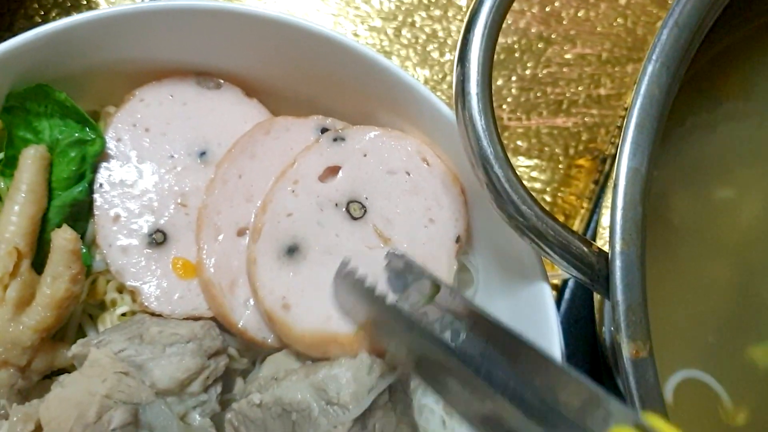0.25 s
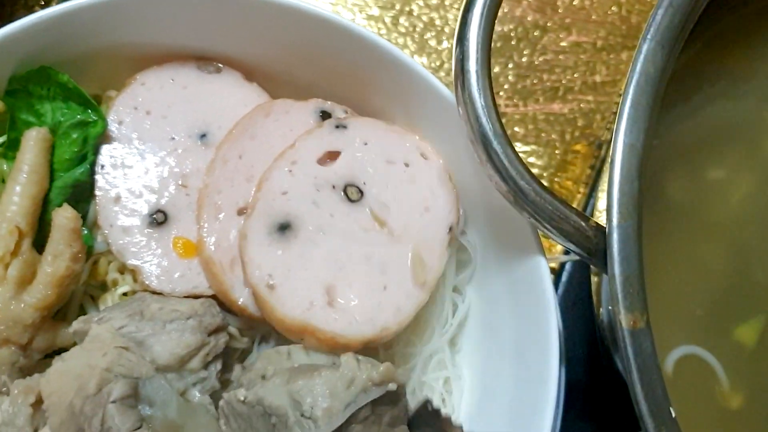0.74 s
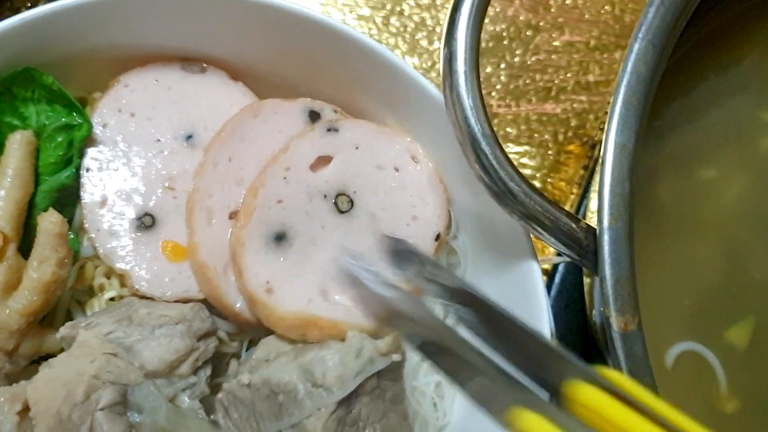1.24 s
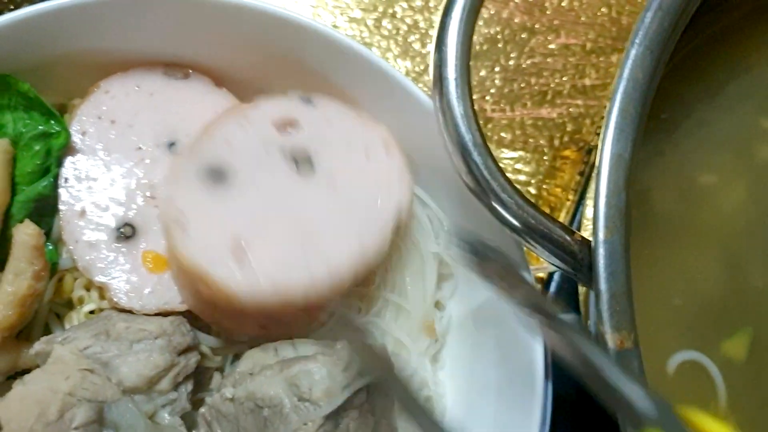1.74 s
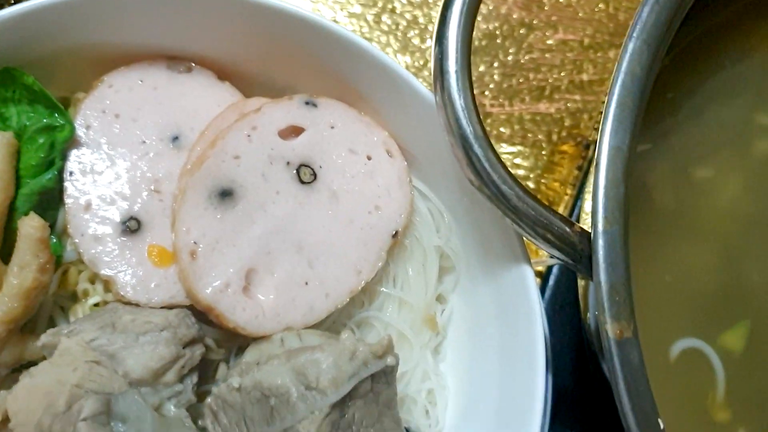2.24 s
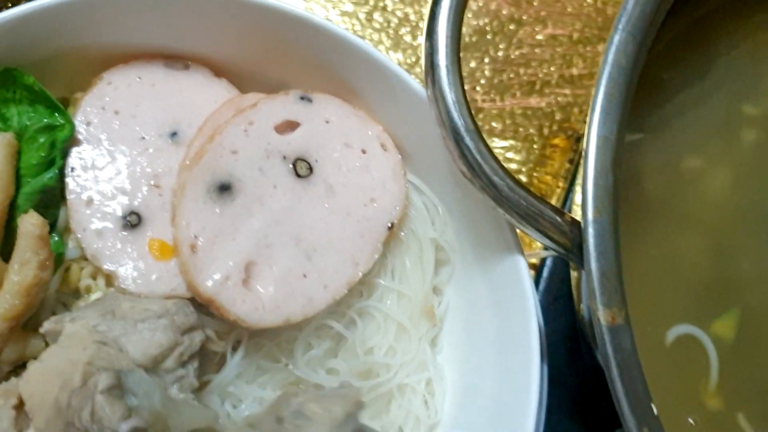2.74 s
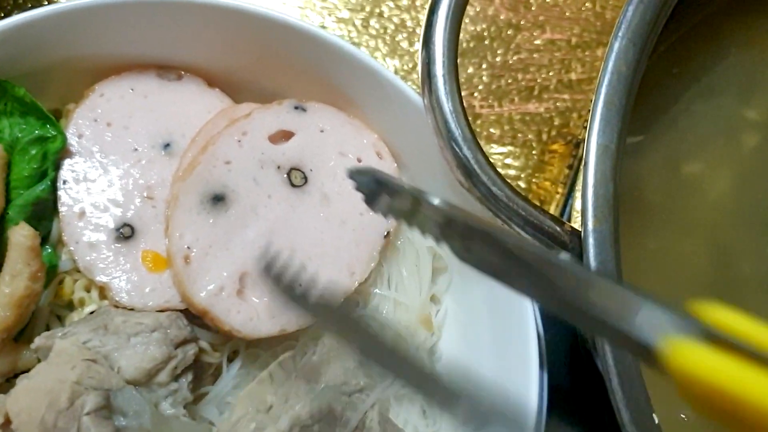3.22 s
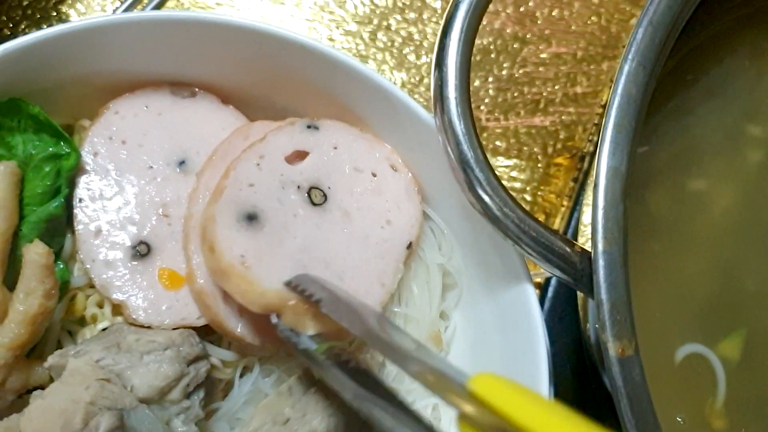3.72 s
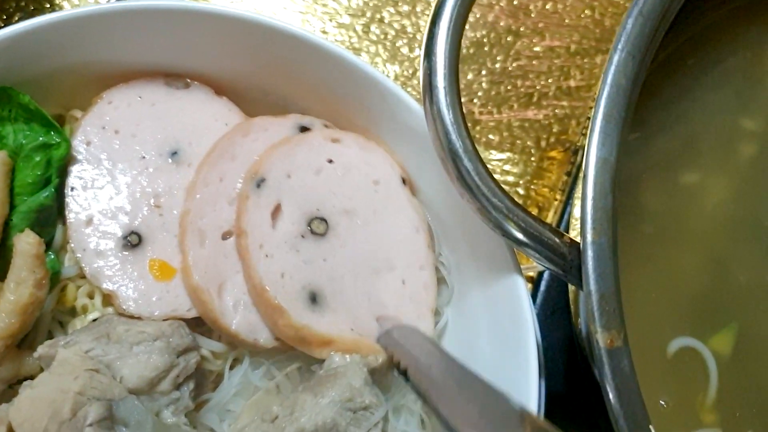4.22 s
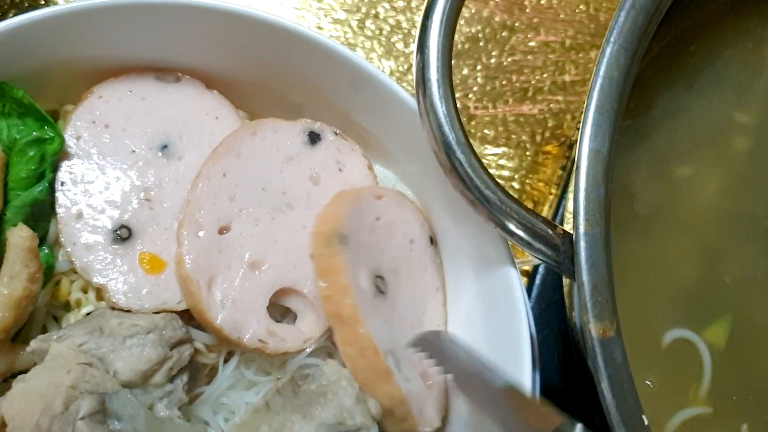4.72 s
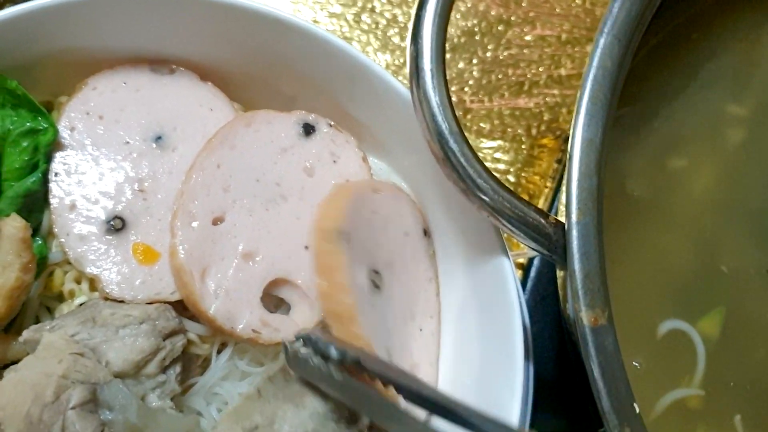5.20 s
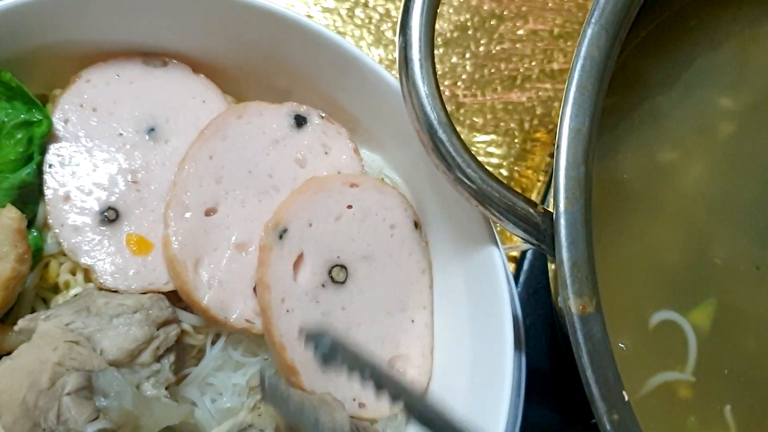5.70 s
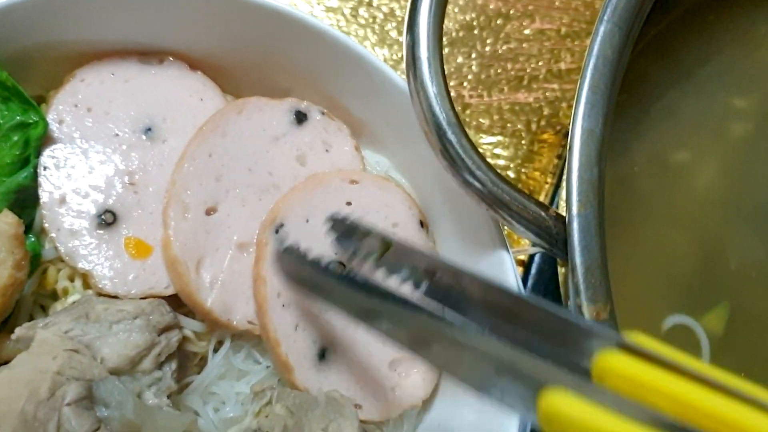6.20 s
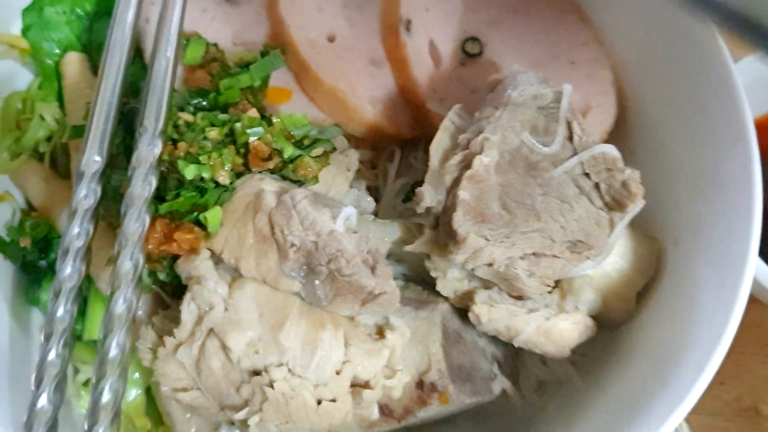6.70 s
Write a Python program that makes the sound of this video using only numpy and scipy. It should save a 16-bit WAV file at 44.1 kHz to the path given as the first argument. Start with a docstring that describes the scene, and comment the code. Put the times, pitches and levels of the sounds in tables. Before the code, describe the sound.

In a small kitchen with a low wavering motor hum, steel tongs work at a food-filled china bowl close to the microphone. Bright, short clinks come in the first two seconds, then mostly dull knocks and tiny scrapes, a last cluster of clinks before five seconds, and finally only hum, dropping suddenly to quieter room tone.

```python
"""A small kitchen with a low hum, where steel tongs arrange slices of sausage in a full china bowl.
They clink on the bowl and touch a steel pot: decaying modes behind a burst of noise, plus clear rim tones.
They knock dully through the food (low modes, softened), scrape with toothed tips (dense random slips
through the ringing arms) and shift the food wetly (swells of noise).
Shaped noise makes hum, rumble and hiss; near the end they drop abruptly to a quieter room tone."""
import sys
import numpy as np
from scipy import signal
from scipy.fft import rfft, irfft, next_fast_len
from scipy.io import wavfile

SR = 44100
rng = np.random.default_rng(int(sys.argv[2]) if len(sys.argv) > 2 else 0)


def bounce(signal):
    """Save signal as a 16-bit WAV file at the path given by the first command-line argument."""
    frames = np.transpose(np.atleast_2d(signal))
    limited = np.clip(frames, -1, 1)
    pcm = np.round(limited * 32767).astype(np.int16)
    wavfile.write(sys.argv[1], SR, pcm)


N = 306495  # samples

# tongs on the bowl: [t/s, attack level/dB, factor on the mode t60s, f/Hz favoured by the contact spot]
BOWL_CLINKS = [(.5012, -9.5, 0.37, 5070), (.582, -23, 0.33, 5730), (.767, -15, 0.34, 3140),
               (1.297, -6.5, 0.61, 8300), (2.1595, -8, 0.43, 12700), (2.578, -31.5, 0.26, 5240),
               (4.4545, -17.5, 0.3, 5360), (4.633, -26, 0.64, 2010), (4.708, -36.5, .7, 4350),
               (4.754, -39, .99, 4300)]
# modes of the bowl, damped by its filling: [f/Hz, relative level/dB, t60/s before the clink's factor]
BOWL_MODES = [(640, -17, .05), (900, -15, .05), (1590, -11, .075), (2120, -13, .06), (2835, 1, .11),
              (2980, -6, .06), (4340, 0, .08), (5350, -13, .05), (6145, -2.5, .08), (7250, -13, .04),
              (8165, -3, .07), (9460, -1.5, .055), (10370, 0, .06), (10850, -6, .05), (11635, 2, .055),
              (12880, 1, .06), (14480, -2, .055), (15550, 0, .06)]
# tongs on the pot: [t/s, attack level/dB, factor on the mode t60s, f/Hz favoured by the contact spot]
POT_TINKS = [(.0228, -24, 0.79, 4470), (1.783, -29.5, 0.73, 5700)]
# modes of the ringing steel: [f/Hz, relative level/dB, t60/s before the tink's factor]
STEEL_MODES = [(470, -17, .9), (1320, -7, .18), (2030, -14, .6), (2164, -14, .6), (2891, -10, .6),
               (3623, -2, .4), (4420, 2, .15), (4544, -12, .8), (4608, -11, .9), (4651, -11, .8),
               (5233, -4, .38), (5453, -13, .5), (5975, -7, .16), (6239, -14, .35), (6794, -9, .3),
               (7192, -11, .22), (7779, -9, .2), (10660, -13, .2), (12800, -9, .18), (15300, -9, .14)]
# noisy clash of the tongs: [f/Hz, relative level/dB per Hz]
CLASH_SPECTRUM = [(150, -20), (600, -2.5), (2000, -0.5), (4200, 4), (5200, 2), (7500, 3), (8900, 0.5),
                  (11000, 3.5), (16000, -2)]
# the rim sings on when the tongs spring clear: [t/s, level/dB of the main tone, f/Hz of the mode]
RIM_RINGS = [(0.504, -29, 4320), (.583, -27.5, 6145), (0.867, -36, 2826), (1.436, -32.5, 6120),
             (2.162, -23, 2826), (4.637, -30.5, 2840), (4.755, -31.5, 2826)]
# knocks through the food: [t/s, level/dB, hardness as the f/Hz above which the blow fades]
FOOD_KNOCKS = [(.025, -19.5, 280), (.776, -14, 1200), (1.305, -22, 600), (1.772, -27.5, 1830),
               (2.33, -25, 470), (2.578, -23.5, 650), (2.626, -24.5, 1250), (3.158, -24.5, 1200),
               (3.587, -20.5, 340), (3.808, -18, 200), (4.456, -22.5, 1020), (4.634, -29, 1300),
               (5.146, -34.5, 1400)]
# modes of the bowl rocking on the table: [f/Hz, relative level/dB, t60/s]
TABLE_MODES = [(180, -8, 0.13), (319.4, -4.5, 0.14), (353.2, -2, 0.2), (593, -4, 0.083), (822, -3.5, 0.097),
               (929.5, 5.5, 0.071), (1034, 3, 0.1), (1360, -3, 0.055)]
# toothed tips scraping: [t/s, rms level/dB of the steady stroke, length/s, L-R level/dB]
TIP_SCRAPES = [(.785, -21.5, 0.036, 2.5), (0.851, -38, 0.036, 4), (2.407, -34.5, 0.017, 3.5),
               (2.648, -27, 0.015, 2.5), (2.716, -47, 0.018, 8), (2.796, -45.5, .018, 6),
               (3.032, -38.5, 0.019, 1.5), (3.191, -31, 0.033, 2.5), (3.6, -46.5, 0.061, -15),
               (4.683, -39.5, 0.027, -1), (5.145, -47, 0.013, 10)]
# grit of the slipping teeth: [f/Hz, relative level/dB per Hz]
RASP_SPECTRUM = [(290, -42.5), (500, -6), (933, -4.5), (2040, -6.5), (2850, -1.5), (3650, -5.5), (4210, -9),
                 (6230, -8), (7000, -5), (9360, -13), (10400, -4.5), (13400, -15), (16000, -42)]
# modes of the tongs' arms, damped by the hand: [f/Hz, relative level/dB, t60/s before the scrape's factor]
ARM_MODES = [(2975, -7, 0.13), (4270, 5.5, 0.034), (5480, -1.5, .04), (6946, -2.5, 0.084), (7710, 1, 0.037),
             (10500, -24.5, 0.014), (13100, -1, 0.028), (13700, -29, 0.031), (14100, -3, 0.034)]
# food sliding wetly: [t/s of the middle, rms level/dB at the peak, half length/s]
FOOD_SLIDES = [(2.652, -44.5, 0.1), (3.628, -38, 0.061)]
# wet rustle of the food: [f/Hz, relative level/dB per Hz]
SQUISH_SPECTRUM = [(80, 8), (250, -1), (950, -1), (1600, -9), (6000, -14.5), (15000, -22)]
# motor drone: [centre f/Hz, half width f/Hz, rms level/dB before the stereo lean]
HUM_BANDS = [(68.3, 2.54, -41.5), (47.3, 4.5, -51), (99.6, 13.4, -48), (358.3, 22, -56.5)]
# rumble: [f/Hz, relative level/dB per Hz]
RUMBLE_SPECTRUM = [(12, -49), (20, -17.5), (48, -4.5), (60, 5), (76, 2.5), (97, -13.5), (189, -11),
                   (220, -16), (290, -50), (480, -120)]
# course of the rumble, of which only the swing about its mean is used: [t/s, level/dB]
RUMBLE_COURSE = [(0.0, -44.5), (0.42, -41), (3.04, -45), (5.0, -39), (5.73, -41), (6.17, -37), (6.35, -40)]
# hiss: [f/Hz, relative level/dB per Hz]
AIR_SPECTRUM = [(76, -32), (130, -4.5), (194, -3.5), (228, -10.5), (356, -7), (565, -15), (863, -11.5),
                (2050, -20), (2950, -20.5), (3460, -22), (5620, -22.5), (7300, -23.5), (8740, -32.5),
                (11600, -28.5), (16000, -37.5)]
# quieter room tone: [f/Hz, relative level/dB per Hz]
QUIET_SPECTRUM = [(15, -46), (25, -41.5), (59, 7), (161, -20), (256, -12.5), (293, -21.5), (734, -28.5),
                  (863, -25.5), (2000, -33), (2840, -29), (3520, -37.5), (6050, -31), (9320, -44),
                  (12500, -39), (16000, -52)]
# stereo lean of the background, leftward in the treble: [f/Hz, L-R level/dB]
BACKGROUND_LEAN = [(60, -1.0), (180, -0.5), (550, -0.5), (1650, 3), (4970, 2.5), (15000, 2)]
# left-right correlation of the noises, negative values counting as 0: [f/Hz, correlation]
STEREO_LIKENESS = [(60, 0.98), (150, 0.96), (380, 0.92), (950, 0.24), (2380, -1.76), (5980, -0.83),
                   (15000, 0.099)]
# reverberation of the kitchen: [f/Hz, t60/s]
KITCHEN_T60 = [(200, 0.45), (1000, 0.64), (3000, 0.48), (8000, 0.31), (15000, 0.31)]

CLASH_DB = -5  # noisy clash on the bowl, relative to its ring before spectral shaping
# firm blows are bright, light touches dull: tilts in dB per octave, and half width in dB of the turnover
FIRM_TILT_DB, LIGHT_TILT_DB, FIRM_RANGE_DB = -1.4, -6.5, 0.5
TONGS_PAN_DB = 1  # L-R
RIM_T60_CYCLES = 820  # so higher modes die sooner
RIM_TWIN_DB, RIM_TWIN_HZ = -8.5, 40  # a weaker twin this far below each mode makes it beat
SETTLE_S, SETTLE_DB, SETTLE_HZ = .019, 14, 60  # bowl drops back after a knock: delay, gain, hardness
# a scrape lands with a knock: dB for a 0 dB scrape, dB per dB of scrape, hardness
LANDING_DB, LANDING_GROWS, LANDING_HZ = -25, 0.21, 1400
BRUSH_SPAN_S = (1, 4.9)  # while the tongs pick at the slices, their tips brush the bowl by chance
BRUSH_DB, BRUSH_S, BRUSH_PAN_DB = -50.5, .007, 11  # rms, length, L-R
RUMBLE_TRIM_DB, RUMBLE_SWING = -40.5, 1.4  # level at the mean of the course, factor on its dB swing
AIR_DB, AIR_RISE_DB_PER_S = -44.5, 0.4122  # the hiss creeps up slowly
DROP_S = 6.44  # the quieter room tone sets in
TOP_HZ = 15900  # band limit


def amp(db):
    """Decibels to gain."""
    return 10 ** (np.asarray(db) / 20)


def unit(x):
    """Bring a sound to rms 1."""
    return x / np.sqrt(np.mean(x ** 2) + 1e-20)


def along(points, hz):
    """Read a (Hz, value) curve on a log frequency axis."""
    f, value = np.transpose(points)
    return np.interp(np.log(hz + 1), np.log(f + 1), value)


def filtered(x, response):
    """Shape a sound with a response given as a function of frequency."""
    n = x.shape[-1]
    padded = next_fast_len(n + 8192)
    hz = np.fft.rfftfreq(padded, 1 / SR)
    return irfft(rfft(x, padded) * response(hz), padded)[..., :n]


def coloured(x, spectrum):
    """Colour a sound with a spectrum, at rms 1."""
    return unit(filtered(x, lambda hz: amp(along(spectrum, hz))))


def add(track, s, sound, pan_db=0):
    """Mix a stereo sound into the track at s seconds."""
    part = track[:, round(s * SR):][:, :sound.shape[1]]
    panned = sound * amp([[pan_db / 2], [-pan_db / 2]])
    part += panned[:, :part.shape[1]]


def room_noise(gain):
    """Stereo noise at rms 1, near mono in the bass and diffuse in the treble."""
    def mid_side_gain(hz):
        turn = np.arccos(np.clip(along(STEREO_LIKENESS, hz), 0, 1)) / 2
        return gain(hz) * [np.cos(turn), np.sin(turn)]

    mid, side = filtered(rng.standard_normal((2, N)), mid_side_gain)
    return unit(np.array([mid + side, mid - side]))


def in_kitchen(sound, wet_db, build_s=0.0023, delay_s=.012):
    """Add the kitchen's diffuse tail: decaying noise, drawn afresh for every sound."""
    hz, t, z = signal.stft(rng.standard_normal((2, SR // 2)), SR, nperseg=256)
    decay = amp(-60 * t / along(KITCHEN_T60, hz)[:, None])
    build = 1 - np.exp(-t / build_s)
    tail = signal.istft(z * decay * build, SR, nperseg=256)[1]
    tail = np.pad(tail, ((0, 0), (round(delay_s * SR), 0)))
    wet = signal.fftconvolve(sound, tail / np.linalg.norm(tail[0]), axes=1)
    return sound + amp(wet_db) * wet[:, :sound.shape[1]]


def ring(modes, t, length, split, scatter_db, settle_s=0):
    """Decaying modes, each a close pair because the object is not quite round."""
    hz, db, t60 = np.transpose(modes)[:, :, None]
    gain = amp(db + scatter_db * rng.standard_normal((2, len(modes), 1)))
    # the two microphones sit in different lobes of each mode, a quarter cycle apart
    lobe = rng.choice([-1, 1], hz.shape) * np.array([1, -1])[:, None, None] / 8
    phase = 2 * np.pi * (hz * t + rng.random(hz.shape) + lobe)
    beat_hz = split * np.sqrt(hz) * rng.standard_normal(hz.shape)
    pair = np.sin(phase) + .5 * np.cos(phase + 2 * np.pi * beat_hz * t)
    # damping sets in as the tips settle on the surface
    damped_s = t - settle_s * np.tanh(t / (settle_s + 1e-9))
    decay = amp(-60 * damped_s / (t60 * length))
    return np.sum(gain * decay * pair, axis=1) / np.linalg.norm(amp(db))


def strikes(rows, modes, crack_db, crack_t60, rise_s, wet_db, split, favour_db, settle_s, firm_db):
    """Hard contacts: a short noisy clash plus the struck thing's ring, brighter for blows above firm_db."""
    out, t = np.zeros((2, N)), np.arange(SR * 2 // 3) / SR
    for s, db, length, spot_hz in rows:
        noise = coloured(rng.standard_normal((2, len(t))), CLASH_SPECTRUM)
        clash = amp(crack_db - 60 * t / crack_t60) * noise
        hit = ring(modes, t, length, split, scatter_db=1.1, settle_s=settle_s * length) + clash
        firmness = .5 + .5 * np.tanh((db - firm_db) / FIRM_RANGE_DB)
        bright_db = LIGHT_TILT_DB + firmness * (FIRM_TILT_DB - LIGHT_TILT_DB)

        def contact(hz):
            tilt = bright_db * np.log2(np.maximum(hz, 1500) / 6000)
            spot = favour_db * np.exp(-(np.log2((hz + 1) / spot_hz) / 0.47) ** 2)  # width in octaves
            return amp(tilt + spot)

        hit = filtered(hit, contact)
        attack = 1 - np.exp(-t / rise_s)
        add(out, s, in_kitchen(amp(db) * hit * attack, wet_db), TONGS_PAN_DB)
    return out


def rim():
    """One free mode of the bowl rings out as a clear tone, beating with its weaker twin."""
    out, t = np.zeros((2, N)), np.arange(SR // 2) / SR
    for s, level_db, hz in RIM_RINGS:
        phase = 2 * np.pi * hz * t + np.array([[0], [1.2]])  # radians, left and right
        twin = np.sin(phase - 2 * np.pi * (RIM_TWIN_HZ * t + rng.random()))
        pair = np.sin(phase) + amp(RIM_TWIN_DB) * twin
        tone = amp(-60 * hz * t / RIM_T60_CYCLES) * (1 - np.exp(-t / 0.002)) * pair
        add(out, s, in_kitchen(amp(level_db) * tone, wet_db=-23))
    return out


def knocks():
    """Blows cushioned by the food stir only the low modes of bowl and table; low hardness is duller."""
    out, t = np.zeros((2, N)), np.arange(SR // 3) / SR
    settles = [(s + SETTLE_S, db + SETTLE_DB, SETTLE_HZ) for s, db, _ in FOOD_KNOCKS]
    landings = [(s, LANDING_DB + LANDING_GROWS * db, LANDING_HZ) for s, db, _, _ in TIP_SCRAPES]
    for s, db, hard_hz in [*FOOD_KNOCKS, *settles, *landings]:
        attack = 1 - np.exp(-t / 0.00045)
        mid, side = ring(TABLE_MODES, t, 1, split=1.44, scatter_db=3.5) * attack
        # long waves reach both microphones alike
        side = filtered(side, lambda hz: np.minimum(hz / 950, 1) ** 2)
        blow = filtered(np.array([mid + side, mid - side]), lambda hz: 1 / (1 + 1j * hz / hard_hz) ** 2)
        add(out, s, in_kitchen(amp(db) * blow, wet_db=-20.5))
    return out


def scrapes(slips_per_s=4000, rise_s=0.00061, fall_t60=0.075, arms_db=1.0):
    """Dense tiny slips of the steel teeth excite the tongs' arms during a stroke and its short fade."""
    out, t = np.zeros((2, N)), np.arange(SR // 2) / SR
    for s, db, length, pan_db in [*TIP_SCRAPES, *brushes(count=4)]:
        slips = (rng.random(len(t)) < slips_per_s / SR) * rng.standard_normal(len(t))
        arms = ring(ARM_MODES, t, 0.39, split=0.64, scatter_db=-4.5)
        grit = coloured(rng.standard_normal((2, len(t))) * amp(-60 * t / 0.031), RASP_SPECTRUM)
        one_slip = grit + amp(arms_db) * unit(arms)
        rasp = unit(signal.fftconvolve(slips[None], one_slip, axes=1)[:, :len(t)])
        stroke = (1 - np.exp(-t / rise_s)) * amp(-60 * np.maximum(t - length, 0) / fall_t60)
        add(out, s, in_kitchen(amp(db) * stroke * rasp, wet_db=-12), pan_db)
    return out


def brushes(count):
    """Faint, very short scrapes at chance moments."""
    return [(s, BRUSH_DB, BRUSH_S, BRUSH_PAN_DB) for s in rng.uniform(*BRUSH_SPAN_S, count)]


def slides():
    """A soft swell of rustling noise as a slice shifts over meat and noodles."""
    t = np.arange(N) / SR
    swell = sum(amp(db) * np.exp(-((t - s) / half) ** 2) for s, db, half in FOOD_SLIDES)
    return swell * room_noise(lambda hz: amp(along(SQUISH_SPECTRUM, hz)))


def motor_drone():
    """Narrow bands of noise, heard as a wavering hum."""
    return sum(amp(db) * room_noise(lambda hz: 1 / (1 + ((hz - centre) / width) ** 2))
               for centre, width, db in HUM_BANDS)


def background():
    """Motor drone, rumble and hiss, giving way suddenly to a quieter room tone."""
    t = np.arange(N) / SR
    course_db = np.interp(t, *np.transpose(RUMBLE_COURSE))
    rumble_db = RUMBLE_TRIM_DB + RUMBLE_SWING * (course_db - course_db.mean())
    drone = motor_drone()
    rumble = amp(rumble_db) * room_noise(lambda hz: amp(along(RUMBLE_SPECTRUM, hz)))
    air = amp(AIR_DB + AIR_RISE_DB_PER_S * t) * room_noise(lambda hz: amp(along(AIR_SPECTRUM, hz)))
    quiet = amp(-43.5) * room_noise(lambda hz: amp(along(QUIET_SPECTRUM, hz)))
    after = np.clip((t - DROP_S) / .015, 0, 1)  # 15 ms crossfade
    both = (1 - after) * (drone + rumble + air) + after * quiet
    return filtered(both, lambda hz: amp(along(BACKGROUND_LEAN, hz) * np.array([[.5], [-.5]])))


def scene():
    """Everything on the table, over the kitchen's background."""
    bowl = strikes(BOWL_CLINKS, BOWL_MODES, crack_db=CLASH_DB, crack_t60=0.085, rise_s=0.0005,
                   wet_db=-11.0, split=0.83, favour_db=5.5, settle_s=0.015, firm_db=-25.5)
    pot = strikes(POT_TINKS, STEEL_MODES, crack_db=4.5, crack_t60=0.092, rise_s=0.00055,
                  wet_db=-7.5, split=0.368, favour_db=4.0, settle_s=0, firm_db=-29.5)
    return bowl + rim() + pot + knocks() + scrapes() + slides() + background()


def record(dry):
    """Clip at full scale, then cut steeply above the band limit."""
    return filtered(np.clip(dry, -1, 1), lambda hz: 1 / np.sqrt(1 + (hz / TOP_HZ) ** 120))


dry = scene()
out = record(dry)
bounce(out)
```